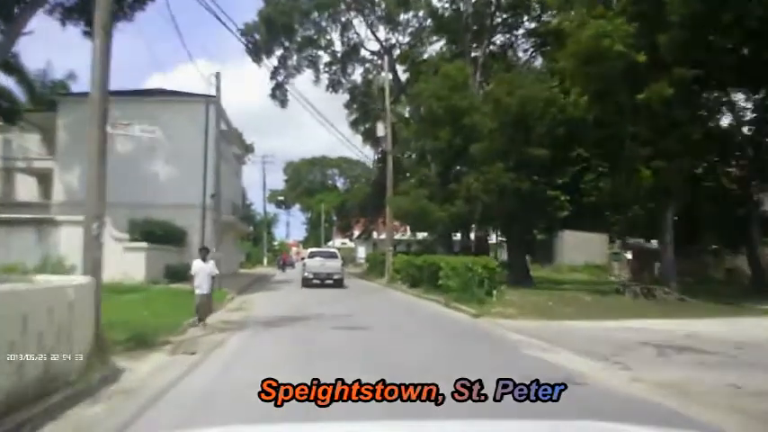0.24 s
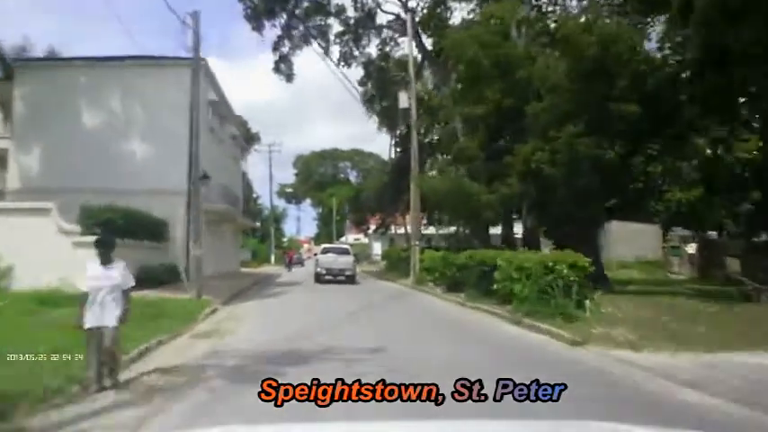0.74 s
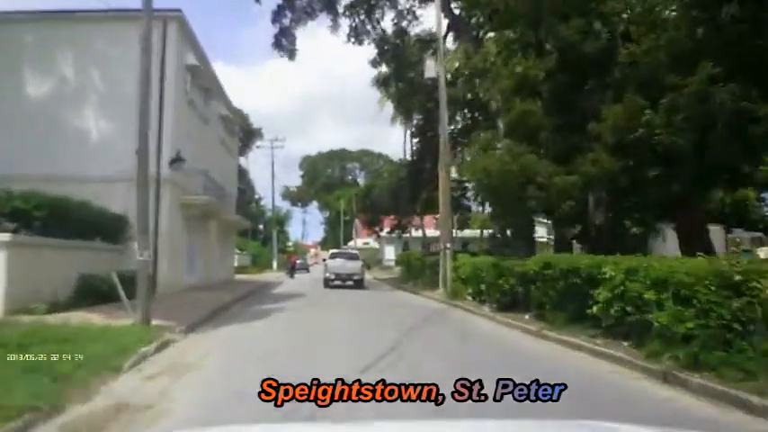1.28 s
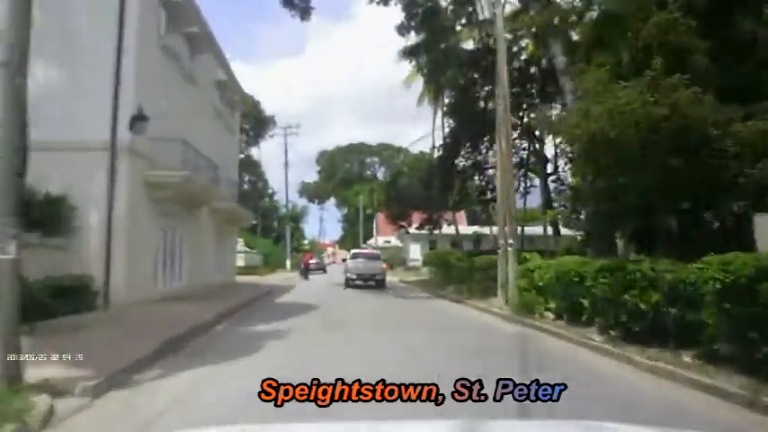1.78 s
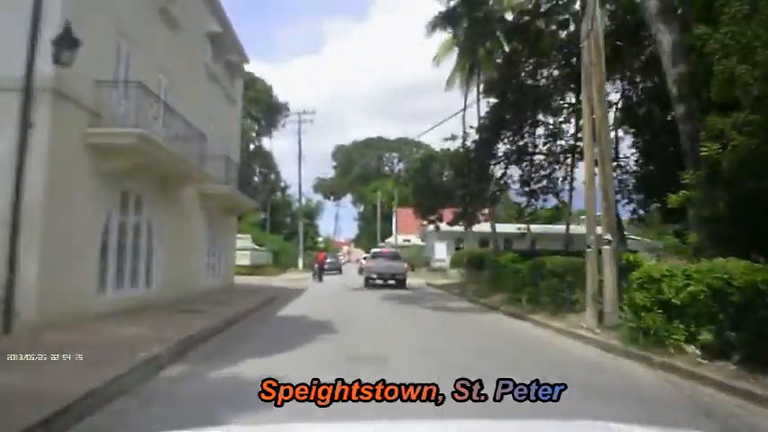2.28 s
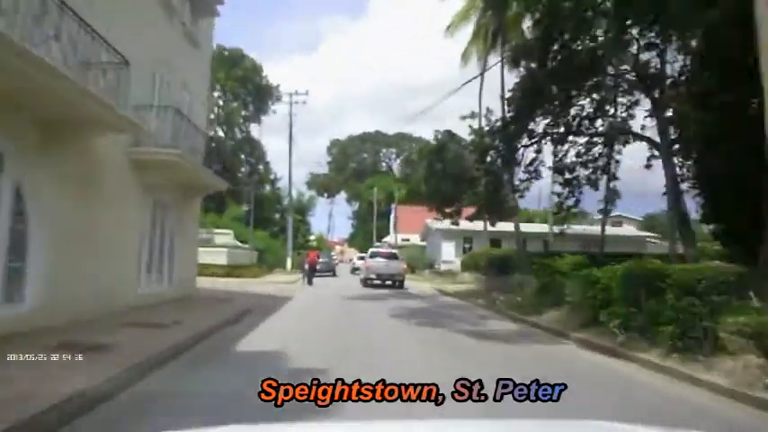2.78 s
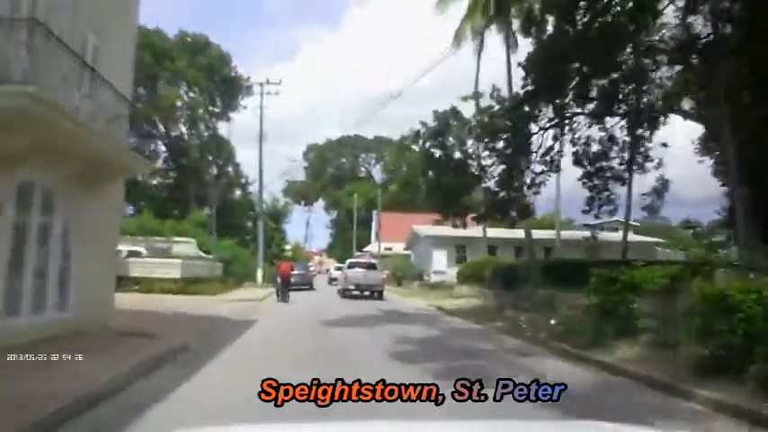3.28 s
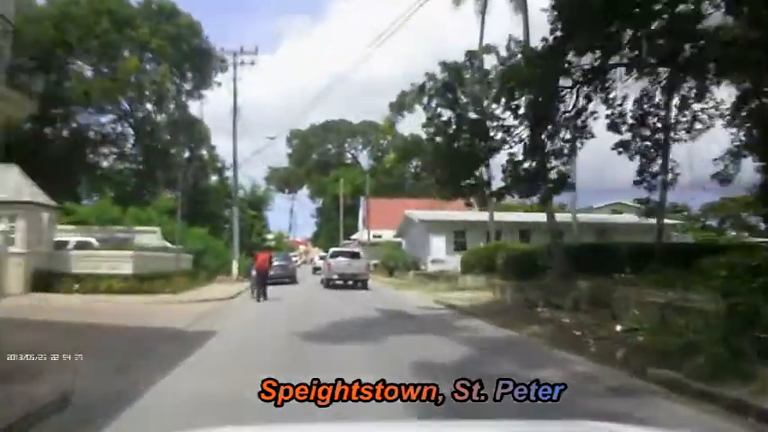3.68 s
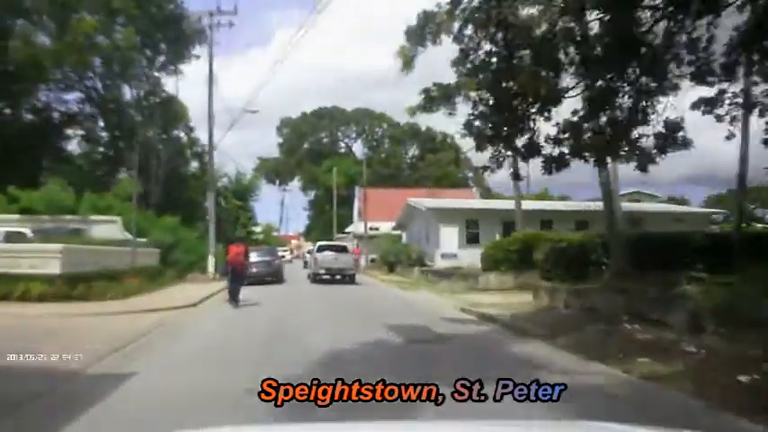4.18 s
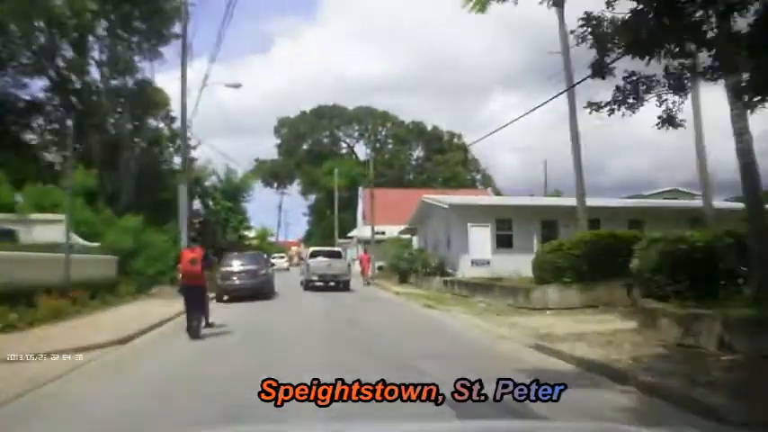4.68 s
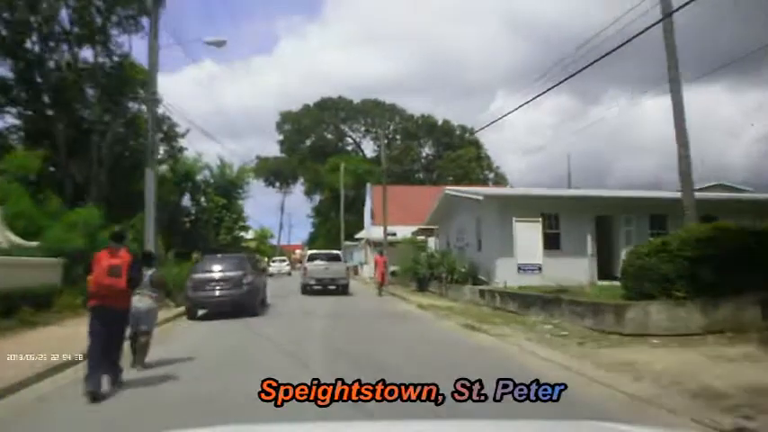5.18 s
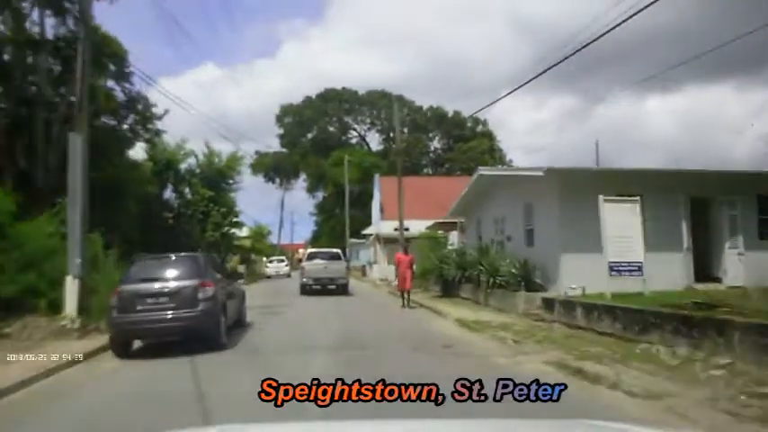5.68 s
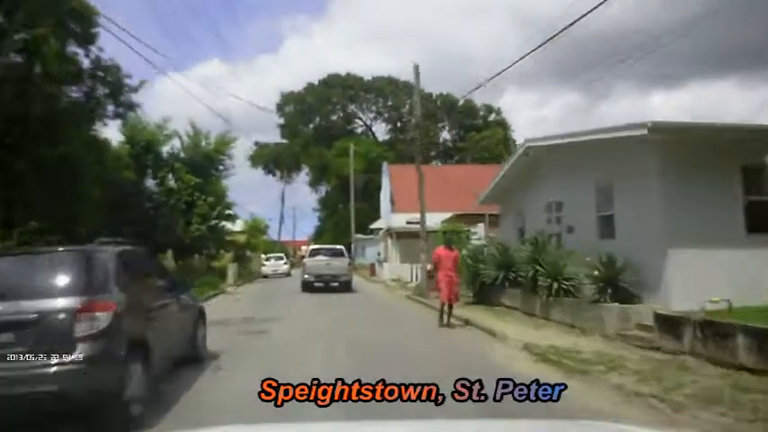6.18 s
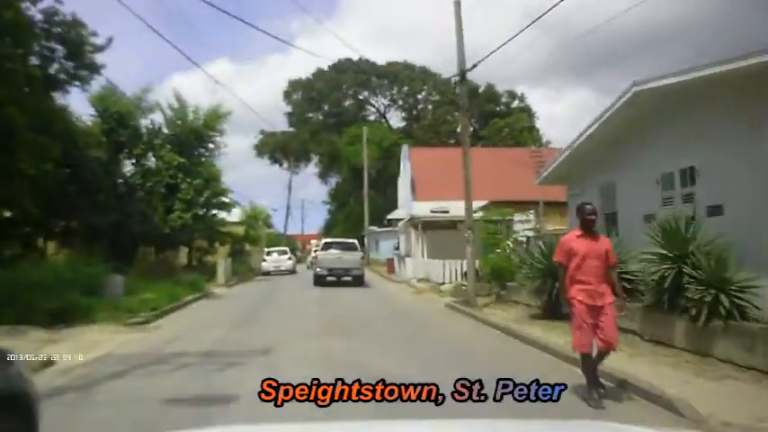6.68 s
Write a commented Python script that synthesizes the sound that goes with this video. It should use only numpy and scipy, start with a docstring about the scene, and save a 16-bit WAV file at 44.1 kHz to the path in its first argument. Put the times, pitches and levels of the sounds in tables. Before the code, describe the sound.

Inside a closed car moving slowly along a town street, a soft muffled tyre roar and faint engine hum run under a deep uneven boom. Rough patches bring brief paired thumps as front and rear wheels cross, with crunching tread and chattering plastic. Small rattles come early and midway, a sharper cluster near five seconds, then light quick taps and the loudest jolts at the end. A dashboard microphone adds faint hiss.

```python
"""A low cabin boom, tyre roar and a faint engine hum inside a car rolling slowly along a town street.
The front and then the rear axle cross each rough patch: the tread crunches, the body thumps,
and loose plastic near the dashboard chatters, knocks, ticks and late on taps; a camera adds hiss and a thin whine.
Shaped noise makes boom, roar, crunch and hiss; wandering sines make hum and whine; decaying modes make the rattles."""
import sys
import numpy as np
from scipy import signal
from scipy.fft import rfft, irfft, next_fast_len
from scipy.io import wavfile
from scipy.ndimage import uniform_filter1d, map_coordinates

SR = 44100
rng = np.random.default_rng(int(sys.argv[2]) if len(sys.argv) > 2 else 0)


def store_wav(level_fs):
    """Save 16-bit WAV to argv[1]."""
    pcm = np.round(np.clip(np.atleast_2d(level_fs), -1, 1) * 32767)
    wavfile.write(sys.argv[1], SR, pcm.T.astype(np.int16))


N = 306406  # length in samples

# Low resonances of the cabin air. Each row: frequency in Hz, relative density in dB per Hz.
CABIN_SPECTRUM = [(10, -20.5), (19, 0.5), (26, -2), (34, -5), (44, -2.5), (54, -13), (66, -10.5), (78, -17),
                  (125, -43.5), (400, -84)]
# Tyre roar over time. Each row: time in seconds, level in dB.
ROAR_LEVEL = [(0, -61.5), (.6, -58.5), (1.3, -59.5), (2, -59), (2.7, -60), (3.5, -60.5), (4.5, -60),
              (5.7, -60.5), (6.2, -61), (6.95, -55.5)]
# Colour of the tyre roar. Each row: frequency in Hz, relative density in dB per Hz.
TYRE_SPECTRUM = [(50, -31.5), (105, 2), (160, -6), (245, -6), (295, -1.5), (355, -9.5), (400, -1.5),
                 (460, -4.5), (540, -14), (650, -9), (950, -14), (1060, -9.5), (1320, -15.5), (1480, -14),
                 (1880, -23), (2080, -26), (2300, -27.5), (2600, -30.5), (3050, -42), (3500, -36.5),
                 (4800, -45.5), (9000, -57.5)]
# Rough patches in the road. Each row: time under the front axle in seconds, front shake length in seconds,
# front boom in dB, front chatter in dB, rear shake length in seconds, rear boom in dB, rear chatter in dB;
# the boom and chatter levels are relative.
ROUGH_PATCHES = [(0.827, 0.019, -34.5, -48.5, 0.04, -29, -47.5), (.91, 0.0091, -51, -54.5, .01, -45, -57),
                 (1.936, 0.09, -37.5, -61, 0.1, -46, -74), (2.895, 0.013, -33.5, -44.5, 0.063, -30.5, -45),
                 (3.035, 0.024, -41, -53.5, 0.0053, -37, -49.5),
                 (3.484, 0.017, -40, -56, 0.006, -71, -60.5), (3.919, 0.02, -45, -61, 0.026, -45, -59.5),
                 (4.905, 0.14, -41, -55.5, 0.1, -35.5, -46), (5.076, 0.015, -31, -43, 0.085, -39.5, -43.5),
                 (5.296, .01, -37.5, -69, 0.022, -33, -50.5), (6.288, 0.064, -41, -67.5, 0.026, -45, -51),
                 (6.572, 0.042, -30.5, -37, 0.038, -23.5, -35.5)]
# Tread crunching over broken asphalt. Each row: frequency in Hz, relative density in dB per Hz.
CRUNCH_SPECTRUM = [(150, -9), (480, 2), (800, -2), (1200, 1), (1850, -10.5), (2200, -7.5), (2700, -12),
                   (3150, -26.5), (4150, -20), (4750, -31), (5600, -24.5), (11000, -44)]
# Modes of the floor pan and doors. Each row: frequency in Hz, relative level in dB, t60 in seconds.
BODY_MODES = [(127.4, -8, 0.048), (213, -0.5, 0.021), (322, -3.5, 0.024), (383, -4, 0.021),
              (523, -1.5, 0.0095)]
# Modes of the loose panel. Each row: frequency in Hz, relative level in dB, t60 in seconds.
PANEL_MODES = [(478, -9.5, 0.015), (948, -2, 0.011), (1248, 3.5, 0.0095), (1550, -4, 0.0071),
               (2090, -11.5, 0.014), (2484, -10.5, 0.0082), (2750, -10, 0.0079), (3650, -11, 0.0032),
               (4200, -21, 0.003)]
# Knocks of the loose panel. Each row: start in seconds, relative level in dB.
PANEL_KNOCKS = [(.801, -44.5), (.8405, -41), (.9097, -35.5), (1.0787, -34), (1.103, -33.5), (1.132, -38),
                (2.89, -54), (2.9055, -35), (3.1424, -50), (3.2173, -45), (3.2253, -35), (3.2279, -27),
                (3.2305, -34), (3.237, -30.5), (3.2935, -36), (5.0234, -38), (5.051, -30.5),
                (5.0696, -25.5), (5.076, -30.5), (5.0988, -24), (5.204, -37.5), (5.3281, -21),
                (5.3817, -22), (5.39, -37), (5.4354, -39), (5.4938, -33), (5.5598, -34.5), (6.5431, -25),
                (6.5762, -30), (6.5842, -25), (6.6755, -26.5), (6.7585, -38.5), (6.8074, -15.5),
                (6.8175, -25), (6.831, -31), (6.8525, -23), (6.8605, -17), (6.894, -35), (6.904, -19)]
# Heavy jolts that thud the whole body. Each row: start in seconds, level in dB.
BODY_THUDS = [(.822, -38.5), (.914, -38), (1.077, -36.5), (3.143, -34), (3.226, -38), (5.089, -31),
              (5.348, -35), (5.402, -39), (6.54, -35), (6.63, -34), (6.807, -21.5), (6.851, -24),
              (6.893, -28)]
# Hard plastic edges ticking together. Each row: start in seconds, relative level in dB.
EDGE_TICKS = [(0.874, -53.5), (0.8783, -51), (0.9445, -50.5), (1.1117, -44.5), (1.1322, -37), (2.782, -57),
              (2.906, -46.5), (3.108, -52), (3.225, -35.5), (3.2305, -45), (3.2926, -47), (3.488, -54),
              (4.2, -59), (5.0518, -38.5), (5.1005, -44.5), (5.1658, -45), (5.1794, -37.5), (5.186, -44),
              (5.2353, -44), (5.3075, -44), (5.3585, -37.5), (5.418, -41.5), (5.492, -42), (5.566, -46),
              (5.575, -48), (6.5305, -39), (6.6216, -29.5), (6.681, -29.5), (6.803, -37), (6.8087, -35),
              (6.818, -44), (6.8344, -27), (6.8841, -29.5), (6.937, -40), (6.9416, -39)]
# Modes of the edges. Each row: frequency in Hz, relative level in dB, t60 in seconds.
EDGE_MODES = [(1900, 3.5, 0.0055), (2510, 1.5, 0.0064), (3100, -1.5, .005), (3770, -3, 0.0081),
              (4300, -1, 0.0088), (5150, -0.5, 0.011), (6020, 1.5, 0.0082), (6400, 1.5, 0.0067),
              (7400, 0, 0.0046), (8000, -0.5, 0.0051), (9460, -1.5, 0.0044), (10760, -1, 0.0038),
              (11900, -1, 0.0023)]
# Taps of a loose trim fastener. Each row: start in seconds, relative level in dB.
FASTENER_TAPS = [(5.6258, -47.5), (5.6836, -48.5), (5.744, -54), (5.8059, -48), (5.8617, -45), (5.918, -46),
                 (5.975, -46.5), (6.0314, -48), (6.0862, -50), (6.1386, -48)]
# Modes of the fastener. Each row: frequency in Hz, relative level in dB, t60 in seconds.
FASTENER_MODES = [(1230, 9, .008), (1560, -1.5, 0.0071), (2450, -13, .006), (3380, -9.5, 0.0049)]
# Decay of the cabin's short tail. Each row: frequency in Hz, t60 in seconds.
CABIN_DECAY = [(200, 0.035), (2000, 0.036), (10000, 0.017)]
# Colour of the camera's hiss. Each row: frequency in Hz, relative density in dB per Hz.
HISS_SPECTRUM = [(300, -21), (3000, 2), (11000, -0.5), (12200, -16)]

AXLE_LAG_S = 0.24  # the rear wheels meet each patch this much later
BOOM_DELAY_S = 0.0044  # the body answers this long after the patch begins
BOOM_RISE_S, BOOM_FALL_S, BOOM_REST_DB = 0.042, 0.12, -48.5  # never quite rests; dB before the boom's trim
SHAKE_RISE_S, SHAKE_FALL_S, SHAKE_REST_DB = 0.024, 0.078, -68  # the trim starts and settles faster
CRACK_DB, CRACK_S = -23, 0.00079  # the crack of a tick: level against its ring, decay constant
REBOUND_S, REBOUND_LOSS_DB = 0.0008, 3  # mean time between the contacts of one tick, loss at each
BRIGHTEN = 0.32  # tilt in dB an octave for each dB of a tick's strength
TOP_HZ = 12950  # the camera's band limit


def amp(db):
    """Decibels to gain."""
    return 10 ** (np.asarray(db) / 20)


def unit(x):
    """Scale to rms 1."""
    return x / np.sqrt(np.mean(x ** 2) + 1e-20)


def along(points, hz):
    """Read (Hz, value) points on a log frequency axis."""
    point_hz, value = np.transpose(points)
    return np.interp(np.log(hz + 1), np.log(point_hz + 1), value)


def curve(rows):
    """Draw (seconds, value) rows as one value per sample."""
    return np.interp(np.arange(N) / SR, *np.transpose(rows))


def wobble(rate):
    """A smooth random curve with rate knots a second."""
    knots = rng.standard_normal(int(N * rate / SR) + 4)
    return map_coordinates(knots, [np.arange(N) * rate / SR])


def filtered(x, response):
    """Shape x by a gain that depends on frequency, leaving phase alone."""
    size = next_fast_len(N + SR // 2)
    gain = response(np.fft.rfftfreq(size, 1 / SR))
    return irfft(rfft(x, size) * gain, size)[:N]


def noise(spectrum):
    """Coloured noise of rms 1."""
    return unit(filtered(rng.standard_normal(N), lambda hz: amp(along(spectrum, hz))))


def tone(hz, drift, rate):
    """A sine of rms 1 whose pitch wanders by about the share drift."""
    pitch = hz * (1 + drift * wobble(rate))
    return unit(np.sin(2 * np.pi * np.cumsum(pitch) / SR))


def ring(modes, attack, vary_db, detune, tilt_db=0):
    """One contact, peak 1: each blow excites the modes a little differently, tilted by tilt_db an octave."""
    t = np.arange(SR // 20) / SR
    hz, db, t60 = np.transpose(modes)[:, :, None]
    size, shift = rng.standard_normal((2, len(modes), 1))
    sign = (-1) ** np.arange(len(modes))[:, None]
    db = db + vary_db * size + tilt_db * np.log2(hz / hz[0])
    decay = amp(db - 60 * t / t60)
    waves = sign * decay * np.sin(2 * np.pi * hz * (1 + detune * shift) * t)
    y = waves.sum(0) * (1 - np.exp(-t / attack))
    return y / np.abs(y).max()


def contacts(events, modes, attack, vary_db, detune, slip, scrape_db):
    """Strike the modes at every (seconds, dB) row; the faces scrape for about slip seconds as they meet."""
    out = np.zeros(N + SR)
    t = np.arange(SR // 100) / SR
    for start, db in events:
        force = amp(scrape_db) * rng.standard_normal(len(t)) * (t / slip) ** 2 * np.exp(-t / slip)
        force[0] += 1  # the first clean blow
        clean = ring(modes, attack, vary_db, detune)
        scraped = np.convolve(clean, force)
        same_energy = np.linalg.norm(clean) / np.linalg.norm(scraped)
        out[round(start * SR):][:len(scraped)] += amp(db) * scraped * same_energy
    return out[:N]


def patter(modes, rate, spread_db, count=10):
    """Random contacts, together of rms 1, at rate a second on each of count similar parts."""
    out = np.zeros(N)
    for _ in range(count):
        struck = rng.random(N) < rate / SR
        strength = amp(spread_db * (2 * rng.random(N) - 1))
        taps = struck * rng.choice([-1, 1], N) * strength
        out += signal.oaconvolve(taps, ring(modes, attack=.0002, vary_db=2, detune=.07))[:N]
    return unit(out)


def wheel_hits():
    """Front, then rear axle on each patch: rows of start s, length s, boom dB, chatter dB."""
    front = [(s, length, boom_db, shake_db) for s, length, boom_db, shake_db, _, _, _ in ROUGH_PATCHES]
    rear = [(s + AXLE_LAG_S, length, boom_db, shake_db)
            for s, _, _, _, length, boom_db, shake_db in ROUGH_PATCHES]
    return front + rear


def jolted(hits, rise, fall, rest_db):
    """Gain that rises to each (s, length, dB) hit, holds while the wheel is on the patch and dies back to rest."""
    t = np.arange(N) / SR
    power = amp(rest_db) ** 2
    for s, length, db in hits:
        away = np.maximum(s - t, 0) / rise + np.maximum(t - s - length, 0) / fall
        power = power + amp(db) ** 2 * np.exp(-2 * np.minimum(away, 20))
    return np.sqrt(power)


def boom():
    """The body sways on its springs and pumps the cabin air at a few low resonances."""
    sway = noise(CABIN_SPECTRUM)
    # evens out the noise's own slow swells, so the gain below shapes the boom
    swell = np.sqrt(np.abs(uniform_filter1d(sway ** 2, size=SR // 8)) + 1e-3)
    hits = [(s + BOOM_DELAY_S, length, db) for s, length, db, _ in wheel_hits()]
    strength = jolted(hits, BOOM_RISE_S, BOOM_FALL_S, BOOM_REST_DB) * amp(1.3 * wobble(9.4) - 4.5)
    return strength * sway / swell


def tyres():
    """Tread on coarse asphalt, muffled by the cabin: coloured noise with a fluttering level."""
    return amp(curve(ROAR_LEVEL) + 1.8 * wobble(35)) * noise(TYRE_SPECTRUM)


def engine():
    """A low hum under light throttle, with a second line that swells briefly."""
    hum_db = curve([(0, -63.5), (1, -61.5), (6.95, -55.5)])
    swell_db = curve([(0, -97), (2, -72), (2.4, -74.5), (2.9, -56), (3.4, -77.5), (6.95, -71)])
    hum = amp(hum_db) * tone(66, drift=0.0144, rate=3.71)
    second_line = amp(swell_db) * tone(114, drift=0.00896, rate=1.89)
    return hum + second_line


def chatter():
    """On a rough patch the tread crunches, the body drums and the trim chatters in clumps."""
    drumming = amp(-2.0) * patter(BODY_MODES, rate=40, spread_db=5.5)
    clumps = unit(amp(4.5 * wobble(110)))
    trim = amp(-10.0) * clumps * patter(PANEL_MODES, rate=40, spread_db=7.5)
    grain = unit(amp(3 * wobble(300) + 2 * wobble(120)))
    crunch = amp(-9.0) * grain * noise(CRUNCH_SPECTRUM)
    hits = [(s, length, db) for s, length, _, db in wheel_hits()]
    shake = jolted(hits, SHAKE_RISE_S, SHAKE_FALL_S, SHAKE_REST_DB + 2.6 * wobble(12))
    return shake * (drumming + trim + crunch)


def knocking():
    """A loose panel knocks: each scraping contact rings its short-lived modes."""
    return amp(-1.5) * contacts(PANEL_KNOCKS, PANEL_MODES, attack=0.00028, vary_db=3.24, detune=0.043,
                                slip=0.0014, scrape_db=-24.5)


def thuds():
    """The suspension passes its heavy jolts on to the floor pan and doors."""
    return contacts(BODY_THUDS, BODY_MODES, attack=0.00032, vary_db=1.5, detune=0.1,
                    slip=0.00082, scrape_db=-22)


def ticking():
    """Hard edges snap together and rebound within a millisecond or two, brighter the harder they meet."""
    out = np.zeros(N + SR)
    t = np.arange(SR // 20) / SR
    hardest = max(db for _, db in EDGE_TICKS)
    for s, db in EDGE_TICKS:
        tilt_db = BRIGHTEN * (db - hardest)
        for k in range(3):  # first contact and two rebounds
            body = ring(EDGE_MODES, attack=.00005, vary_db=2, detune=0.022, tilt_db=tilt_db)
            crack = amp(CRACK_DB) * rng.standard_normal(len(t)) * np.exp(-t / CRACK_S)
            start = s + REBOUND_S * k * (1 + .2 * rng.standard_normal())
            out[round(start * SR):][:len(t)] += amp(db - REBOUND_LOSS_DB * k) * (body + crack)
    return amp(0.5) * out[:N]


def tapping():
    """A loose fastener taps softly for a moment, about 17 times a second."""
    return amp(0.5) * contacts(FASTENER_TAPS, FASTENER_MODES, attack=.00015, vary_db=2.5, detune=0.012,
                               slip=0.00091, scrape_db=-12)


def cabin_echo(x):
    """Glass and upholstery give a very short tail, a different one for each moment's rattles."""
    hop = SR // 20
    # noise bursts, each frequency dying at its own rate
    bursts = rng.standard_normal((N // hop + 1, SR // 10))
    hz, t, z = signal.stft(bursts, SR, nperseg=128)
    decay = amp(-60 * t / along(CABIN_DECAY, hz)[:, None])
    tails = signal.istft(z * decay, SR, nperseg=128)[1]
    x, out = np.pad(x, (hop, SR)), np.zeros(N + SR)
    fade = signal.get_window("hann", 2 * hop)  # neighbouring moments crossfade
    for k, tail in enumerate(tails):
        moment = x[k * hop:][:2 * hop] * fade
        y = signal.fftconvolve(moment, tail / np.linalg.norm(tail))
        out[k * hop:][:len(y)] += y
    return out[hop:][:N]


def scene():
    """Road sound and rattles, with the cabin's short tail on the rattles alone."""
    road = boom() + tyres() + engine()
    rattle = chatter() + knocking() + thuds() + ticking() + tapping()
    return (road + rattle + amp(-11.0) * cabin_echo(rattle))[None]


def record(dry):
    """The camera adds its own hiss and thin whine and keeps nothing above its band limit."""
    hiss = amp(-80.5) * noise(HISS_SPECTRUM)
    whine = amp(-91) * tone(7890, drift=0.0059, rate=61)
    return filtered(dry[0] + hiss + whine, lambda hz: hz < TOP_HZ)[None]


dry = scene()
out = record(dry)
store_wav(out)
```